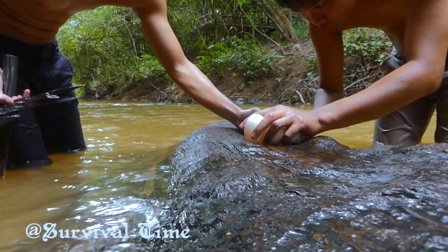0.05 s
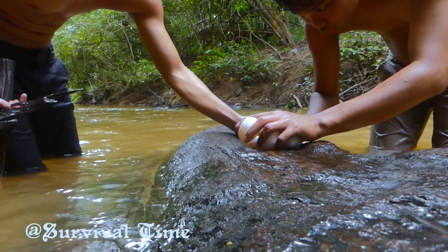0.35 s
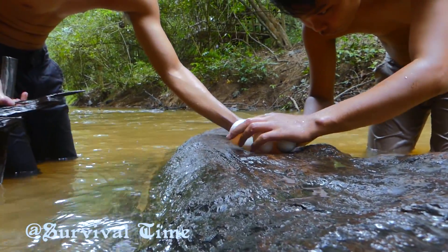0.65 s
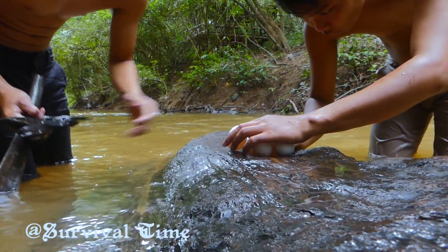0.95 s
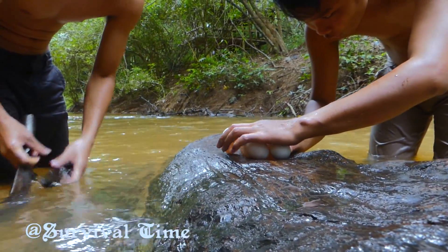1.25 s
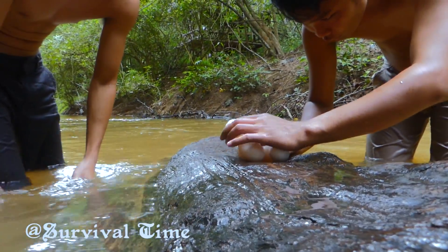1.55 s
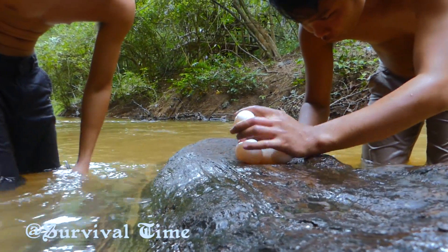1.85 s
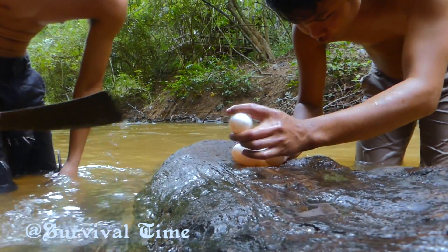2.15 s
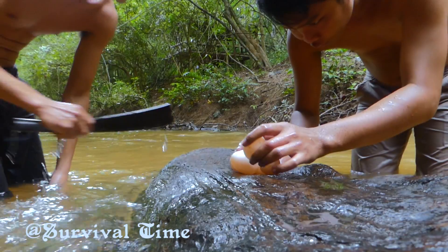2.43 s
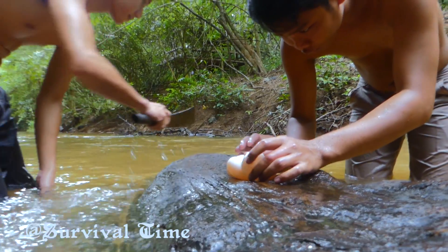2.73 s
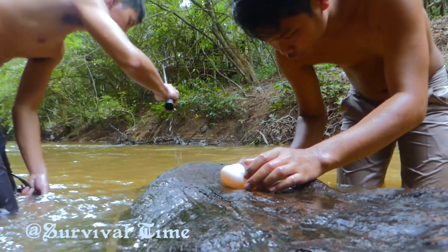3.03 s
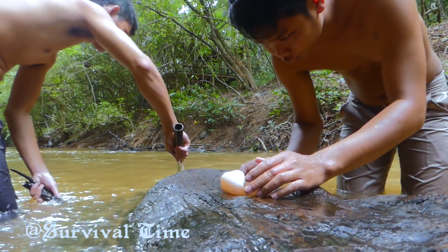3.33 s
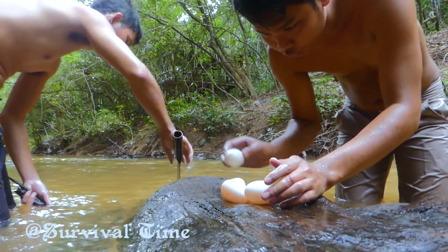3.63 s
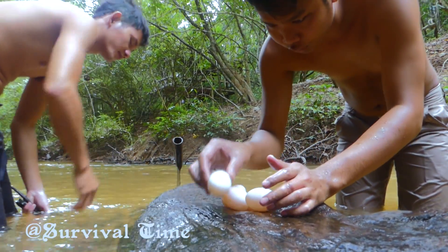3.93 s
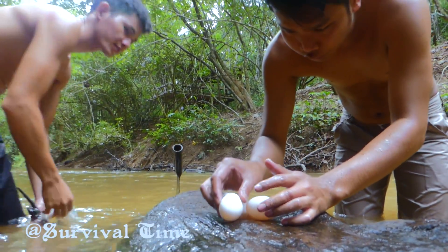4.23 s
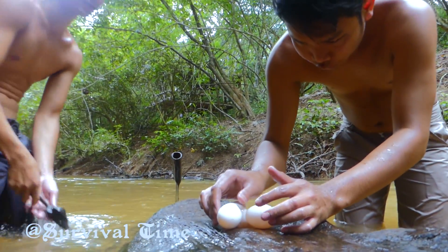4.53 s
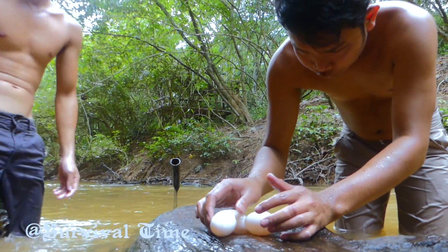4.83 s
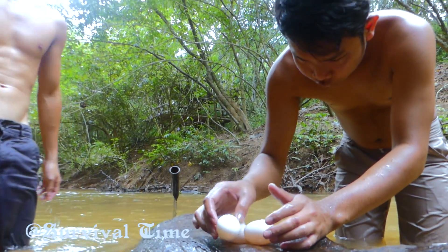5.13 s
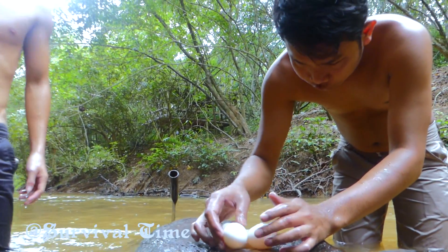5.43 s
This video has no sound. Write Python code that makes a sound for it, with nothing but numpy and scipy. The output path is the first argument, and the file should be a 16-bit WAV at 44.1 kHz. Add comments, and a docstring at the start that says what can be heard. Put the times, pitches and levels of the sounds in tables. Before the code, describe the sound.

Close splashing, bubbling and dripping in a softly running stream, with a light blade clink and a single sharp machete chop.

```python
"""A shallow stream, beside a boulder: two people stand in the water, close to a nearly mono microphone.
One rinses a machete: it clinks on stone under the surface, hands splash, trapped air rings as bubbles
and drops fall back. He drives the blade down with one hard chop, then rinses his hands.
Behind them the stream and insects murmur, with faint far calls and a slight echo off the wooded banks."""
import sys
import numpy as np
from scipy import signal
from scipy.fft import next_fast_len
from scipy.io import wavfile
from scipy.ndimage import uniform_filter1d

SR = 44100
rng = np.random.default_rng(int(sys.argv[2]) if len(sys.argv) > 2 else 0)


def wav_record(signal):
    """Record a signal, one row per channel, as 16-bit PCM in the file named by sys.argv[1]."""
    frames = np.transpose(np.atleast_2d(signal))
    bounded = np.clip(frames, -1, 1)
    # unit amplitude maps onto the largest positive 16-bit level
    quanta = np.round(bounded * 32767).astype(np.int16)
    wavfile.write(sys.argv[1], SR, quanta)


N = 245637
TIME = np.arange(N) / SR


def gain_of(db):
    """Decibels to amplitude."""
    return 10 ** (np.asarray(db) / 20)


def unit_rms(x):
    """Scales to rms 1."""
    return x / np.sqrt(np.mean(x ** 2) + 1e-20)


def at_hz(points, hz):
    """Reads a curve on a log-frequency axis."""
    f, value = np.transpose(points)
    return np.interp(np.log(hz + 1), np.log(f + 1), value)


def fader(curve):
    """A curve of t/s, level/dB as a gain for every sample."""
    return gain_of(np.interp(TIME, *np.transpose(curve)))


def add(mix, s, sound):
    """Mixes a sound in at s seconds."""
    part = mix[max(round(s * SR), 0):][:len(sound)]
    part += sound[:len(part)]


def colour(x, gain_db):
    """Minimum-phase filter whose gain in dB is a function of frequency."""
    size = next_fast_len(len(x) + 2048)
    hz = abs(np.fft.fftfreq(size, 1 / SR))
    log_gain = np.log(np.maximum(gain_of(gain_db(hz)), 1e-4))
    response = np.exp(np.conj(signal.hilbert(log_gain)))
    return np.fft.ifft(np.fft.fft(x, size) * response).real[:len(x)]


def hump(centre_hz, octaves, skirt_db=26):
    """A resonant hump with sloping skirts, in dB against frequency."""
    return lambda hz: -skirt_db * np.log10(1 + (np.log2((hz + 1) / centre_hz) / octaves) ** 2 / 2)


def wobble(count, per_s):
    """Smooth random sway of rms 1 that changes about per_s times a second."""
    t = np.arange(0, count + 16, 16) / SR
    hz = np.geomspace(per_s / 4, per_s, num=12)
    turns = hz[:, None] * t + rng.random((len(hz), 1))
    sway = np.sin(2 * np.pi * turns).sum(0) / np.sqrt(len(hz) / 2)
    return np.interp(np.arange(count) / SR, t, sway)


def bubble(hz, t60, climb, rise_cycles=0.42):
    """An air pocket rings; for the first 40 ms its pitch slides by climb octaves per second."""
    t = np.arange(int(max(t60, .004) * SR)) / SR
    pitch = np.minimum(hz * 2 ** (climb * np.minimum(t, .04)), SR / 2)
    envelope = (1 - np.exp(-t * hz / rise_cycles)) * gain_of(-60 * t / t60)
    return envelope * np.sin(2 * np.pi * np.cumsum(pitch) / SR)


def burst(hz, octaves, t60):
    """A dying crack of noise around one frequency, peaking near 1."""
    t = np.arange(4096) / SR
    fall = gain_of(-60 * t / max(t60, .002))
    crack = colour(rng.choice([-1., 1.], len(t)) * fall, hump(hz, max(octaves, .04)))
    return .5 * crack * np.linalg.norm(fall) / np.linalg.norm(crack)


def pings(spectrum, cycles, pitches, hits_each, spread_db=4.0):
    """A dense cloud of random pings at rms 1; higher ones die sooner."""
    out = np.zeros(N)
    for hz in np.geomspace(600, 14000, pitches):
        when, chance, polarity = rng.random((hits_each, 3)).T
        strength = np.sign(polarity - .5) * gain_of(spread_db * np.minimum(-np.log(chance), 3.5))
        hits = np.bincount((when * N).astype(int), strength, minlength=N)
        pitch = hz * rng.uniform(.96, 1.04)
        t60 = max(cycles / hz, .0035) * rng.uniform(0.56, 1.9)
        ring = bubble(pitch, t60, climb=rng.uniform(0, 17.0), rise_cycles=0.97)
        out += signal.oaconvolve(hits, ring / np.linalg.norm(ring) * np.sqrt(hz))[:N]
    return unit_rms(colour(out, lambda hz: at_hz(spectrum, hz)))


def churn(calm_db=-54.5):
    """How hard the hands stir the surface, as a gain; at calm_db or below it throws no spray."""
    # one curve for rinsing the blade, one for the hands: t/s, level/dB
    rinses = [
        [(1.2, -54), (1.248, -50), (1.336, -42.5), (1.384, -40.5), (1.428, -40.5), (1.55, -45), (1.628, -52.5),
         (2.12, -51), (2.228, -53), (2.95, -54)],
        [(4.05, -54.5), (4.252, -51), (4.38, -44.5), (4.442, -45), (4.562, -45), (4.748, -51), (5.052, -53),
         (5.57, -53.5)],
    ]
    stirred = sum(fader(rinse) * (TIME > rinse[0][0]) * (TIME < rinse[-1][0]) for rinse in rinses)
    return np.sqrt(np.maximum(stirred ** 2 - gain_of(calm_db) ** 2, 0))


def forest(insects_db=-62, insects_hz=4720, waver=0.017, trill_db=3.5):
    """Far off, a steady insect chorus and a few faint trilling calls."""
    # calls: t/s, length/s, start f/Hz, end f/Hz, level/dB
    far_calls = [(2.408, 0.036, 2020, 1950, -57), (2.48, 0.066, 2100, 1990, -56),
                 (2.88, 0.19, 9900, 9300, -64.5), (3.172, 0.079, 1960, 1700, -57),
                 (3.223, 0.027, 1710, 1430, -49), (4.978, 0.41, 3410, 3320, -62.5),
                 (5.25, .08, 6800, 7200, -62)]
    out = gain_of(insects_db) * unit_rms(colour(rng.standard_normal(N), hump(insects_hz, octaves=0.12)))
    for s, length, start_hz, end_hz, db in far_calls:
        count = int(length * SR)
        pitch = np.linspace(start_hz, end_hz, count) * (1 + waver * wobble(count, per_s=150))
        envelope = gain_of(db + trill_db * wobble(count, per_s=53)) * signal.windows.tukey(count, .5)
        add(out, s, envelope * np.sin(2 * np.pi * np.cumsum(pitch) / SR))
    return out


def buffeting(trim_db=1):
    """A faint low rumble comes and goes."""
    # course of the rumble: t/s, level/dB before the trim
    swells = [(0.0, -61), (0.17, -59.5), (1.18, -64), (2.5, -65), (2.78, -75), (3.21, -64), (4.98, -73),
              (5.57, -63)]
    rumble = unit_rms(colour(rng.standard_normal(N), hump(centre_hz=38.0, octaves=0.77)))
    return gain_of(trim_db) * fader(swells) * rumble


def banks(x, width=0.059, echoes_per_s=2000):
    """Scattered echoes from rock and trees reach the microphone nearly alike in both channels."""
    # decay of the wooded banks: f/Hz, t60/s
    decay = [(100, 0.35), (1000, 0.56), (5000, 0.82), (15000, 0.07)]
    taps = rng.standard_normal((2, SR // 2)) * (rng.random((2, SR // 2)) < echoes_per_s / SR)
    hz, t, spectra = signal.stft(taps, SR, nperseg=256)
    tail = signal.istft(spectra * gain_of(-60 * t / at_hz(decay, hz)[:, None]), SR, nperseg=256)[1]
    mid, side = signal.fftconvolve(x[None], tail / np.linalg.norm(tail[0]), axes=1)[:, :N]
    return np.array([mid + width * side, mid - width * side])


def ripples(swell_db=2.0, settle_s=0.22):
    """A gain that lifts the stream a little as the churning spreads and settles."""
    keep = np.exp(-1 / (settle_s * SR))
    stirred = signal.lfilter([1 - keep], [1, -keep], churn())
    return gain_of(swell_db * stirred / stirred.max())


def stream(wash_db=-50.9, patch_db=2.0):
    """The even wash of running water behind the two people, with drifting patches of brightness."""
    # spectrum of the wash: f/Hz, relative level/dB
    wash = [(15, -38), (25, -12), (144, -0.5), (205, -5.5), (241, -1.5), (425, -5.5), (812, -9.5),
            (1040, -12), (1120, -10), (1590, -13), (2810, -16), (4100, -18.5), (4690, -12), (5670, -18.5),
            (15800, -22)]
    # likeness of left and right: f/Hz, correlation
    likeness = [(60, 0.99), (180, 1), (550, 0.98), (1650, 0.98), (4970, 0.95), (15000, 0.77)]
    frames, hz = N // 256 + 5, np.fft.rfftfreq(1024, 1 / SR)
    left_re, left_im, other_re, other_im, patches = rng.standard_normal((frames, len(hz), 5)).T
    patches = unit_rms(uniform_filter1d(uniform_filter1d(patches, size=9, axis=0), size=8, axis=1))
    alike = at_hz(likeness, hz)[:, None]
    left = left_re + 1j * left_im
    right = alike * left + np.sqrt(1 - alike ** 2) * (other_re + 1j * other_im)
    spectra = np.array([left, right]) * gain_of(at_hz(wash, hz)[:, None] + patch_db * patches)
    water = signal.istft(spectra, nperseg=1024, noverlap=768)[1][:, :N]
    return gain_of(wash_db) * ripples() * unit_rms(water)


def spray(fizz_db=-3, mist_db=-6.5):
    """Close by, countless tiny bubbles and bursting droplets follow the churning."""
    # tiny bubbles: f/Hz, relative level/dB
    fizz_spectrum = [(500, -7.5), (1300, 2), (2500, 0), (4000, -3), (6000, -7.5), (9000, -6), (13000, -28)]
    # bursting droplets: f/Hz, relative level/dB
    mist_spectrum = [(200, -18), (600, 2), (1500, 0), (3000, -3), (6000, 0), (10000, -6), (15000, -12)]
    fizz = pings(fizz_spectrum, cycles=46, pitches=44, hits_each=170)
    mist = pings(mist_spectrum, cycles=13, pitches=16, hits_each=1100)
    return churn() * (gain_of(fizz_db) * fizz + gain_of(mist_db) * mist)


def spatter(over_churn_db=10.5, low_hz=2600, high_hz=9500, spread_db=12, count=230):
    """Droplets thrown up by the churning crackle as they land."""
    out = np.zeros(N)
    for k, (late, pitch, size) in enumerate(rng.random((count, 3))):
        tick = burst(low_hz * (high_hz / low_hz) ** pitch, octaves=0.25, t60=0.012)
        add(out, (k + late) / count * N / SR, gain_of(spread_db * (size - .5)) * tick)
    return gain_of(over_churn_db) * churn() * out


def froth(over_churn_db=6, low_hz=1200, high_hz=4200, cycles=45, max_climb=20, spread_db=9, count=420):
    """Small bubbles chirp upward at random, louder the harder the surface is churned."""
    out = np.zeros(N)
    for when, pitch, size, climb in rng.random((count, 4)):
        hz = low_hz * (high_hz / low_hz) ** pitch
        chirp = bubble(hz, cycles / hz, max_climb * climb, rise_cycles=1.1)
        add(out, when * N / SR, gain_of(spread_db * (size - .5)) * chirp)
    return gain_of(over_churn_db) * churn() * out


def drips(click_db=-15, trickle_hz=6800, scatter_octaves=0.5, spread_db=2.5):
    """Big drops tick and click on water and rock; small ones trickle off the lifted blade and hands."""
    # single drops: t/s, level/dB, centre f/Hz
    drops = [(1.3027, -19.5, 6440), (1.3433, -26, 5800), (1.369, -22.5, 10500), (1.428, -18.5, 5860),
             (1.472, -24.5, 4800), (1.511, -19, 7600), (1.58, -28, 5500), (1.571, -19, 5400),
             (1.9478, -26, 5960), (1.96, -30, 7000), (1.9783, -27, 10200), (2.005, -20.5, 9700),
             (2.208, -29, 5870), (2.232, -30, 8600), (2.266, -31, 4970), (2.3821, -23, 4970),
             (2.568, -29.5, 7100), (2.717, -34, 6400), (2.754, -28, 4340), (4.201, -28.5, 4970),
             (4.237, -31, 2800), (4.2915, -8.5, 5700), (4.3264, -22.5, 8160), (4.4326, -25.5, 4230),
             (4.501, -24, 8050), (4.518, -25.5, 3550), (4.5605, -26, 5500), (4.649, -28.5, 5860),
             (4.6962, -14, 7670), (4.986, -28.5, 7300), (5.025, -25, 6650), (5.122, -31.5, 5000)]
    # runs of small drops: start t/s, end t/s, rate/Hz, level/dB
    trickles = [(1.8, 2.35, 20, -37), (2.55, 2.8, 12, -37), (4.401, 4.902, 14, -35)]
    out = np.zeros(N)
    for s, db, hz in drops:
        tick = burst(hz, octaves=0.2, t60=0.016)
        click = gain_of(click_db) * burst(hz=9000, octaves=1.0, t60=0.007)
        add(out, s, gain_of(db) * (tick + click))
    for start, end, per_s, db in trickles:
        for s in np.arange(start, end, 1 / per_s):
            late = rng.random() / per_s
            size, pitch = rng.standard_normal(2)
            tick = burst(trickle_hz * 2 ** (scatter_octaves * pitch), octaves=0.2, t60=0.024)
            add(out, s + late, gain_of(db + spread_db * size) * tick)
    return out


def plinks(cycles=62, sag_octaves_per_cycle=0.005, tick_db=-8, tick_ratio=1.85):
    """A drop ticks on the surface and drives a bubble down, so its pitch sags."""
    # falling drops that trap a bubble: t/s, f/Hz, level/dB
    drops = [(1.624, 1040, -32.5), (1.851, 3420, -26.5), (1.91, 1850, -29.5), (1.991, 2140, -28),
             (1.999, 1418, -24), (2.02, 2660, -29.5), (4.058, 963, -25.5), (4.196, 1270, -30.5),
             (4.607, 1650, -18), (4.729, 1013, -27.5), (4.757, 1290, -22.5), (4.808, 1090, -30.5)]
    out = np.zeros(N)
    for s, hz, db in drops:
        add(out, s, gain_of(db + tick_db) * burst(tick_ratio * hz, octaves=0.63, t60=0.015))
        add(out, s, gain_of(db) * bubble(hz, cycles / hz, climb=-sag_octaves_per_cycle * hz))
    return out


def bubbles(flutter=0.17, ring_cycles=70.3, pop_cycles=23, gulp_cycles=8.0):
    """Trapped air rings and flutters on the moving surface; pops and gulps die in fewer cycles."""
    # air pushed under by the hands: t/s, f/Hz, level/dB, climb/(octaves per s)
    trapped_air = [(1.297, 2073, -30, 3), (1.329, 2190, -29, 3), (1.368, 1600, -27, -9.5),
                   (1.384, 363, -21.5, 2.5), (1.389, 750, -17.5, -2), (1.402, 602, -12.5, 2.5),
                   (1.461, 1680, -28.5, 13), (1.498, 1700, -22.5, 1), (1.511, 1435, -15.5, 2.5),
                   (1.518, 1199, -22.5, -1), (1.535, 799, -23, 7.5), (4.18, 1425, -39, 21),
                   (4.253, 1450, -27, 17), (4.284, 1050, -27, 12), (4.305, 1986, -27, 1),
                   (4.312, 1190, -23, 35), (4.312, 2500, -27, 15), (4.318, 1595, -28, 14),
                   (4.367, 2030, -31, -5), (4.923, 838, -41.5, 26), (5.038, 870, -39, 2),
                   (5.058, 394, -42, 11), (5.086, 550, -37, 35.5)]
    # open pockets popping at the surface: t/s, f/Hz, level/dB
    pops = [(.112, 1980, -29), (1.314, 470, -20), (1.369, 1950, -21), (1.572, 1570, -29.5),
            (4.248, 1300, -26), (4.292, 780, -14), (4.301, 930, -20), (4.357, 894, -19), (4.358, 1340, -27),
            (4.519, 1300, -28.5)]
    # dull gulps against the legs and the boulder: t/s, f/Hz, level/dB
    gulps = [(.257, 63, -38.5), (.99, 154, -26.5), (1.051, 150, -32.5), (1.611, 150, -37),
             (1.651, 145, -33.5), (2.25, 42, -40), (2.327, 165, -34.5), (4.653, 158, -25.5),
             (5.524, 141, -33)]
    out = np.zeros(N)
    for s, hz, db, climb in trapped_air:
        ring = bubble(hz, ring_cycles / hz, climb, rise_cycles=0.6)
        add(out, s, gain_of(db) * ring * (1 + flutter * wobble(len(ring), per_s=208)))
    for s, hz, db in pops:
        add(out, s, gain_of(db) * bubble(hz, pop_cycles / hz, climb=20))
    for s, hz, db in gulps:
        add(out, s, gain_of(db) * bubble(hz, gulp_cycles / hz, climb=-11, rise_cycles=0.43))
    return out


def slaps(octaves=0.72, first_db=-1.5, closing_db=-7, closing_s=0.003):
    """Broad wet cracks; the water closes a moment later with a second, weaker one."""
    # hands and blade on the water, wet things on the rock: t/s, relative level/dB, centre f/Hz, t60/s
    hits = [(.408, -33, 1200, 0.03), (.513, -41, 9000, .037), (.781, -37, 3500, 0.056),
            (1.268, -12.5, 4750, 0.021), (1.2696, -20, 1210, 0.016), (1.313, -14, 755, 0.027),
            (1.357, -28, 900, .04), (1.361, -21, 5000, 0.032), (1.3807, -21, 480, .022),
            (1.3822, -15, 2850, .015), (1.3894, -13, 1290, 0.023), (1.398, -12.5, 2520, 0.021),
            (1.422, -23.5, 7000, 0.051), (1.508, -25, 3500, .06), (2.086, -31, 8500, .03),
            (2.8259, -26, 580, .016), (4, -34, 13000, .012), (4.293, -18.5, 1810, 0.039),
            (5.345, -33, 890, .02), (5.4412, -31.5, 540, 0.053)]
    out = np.zeros(N)
    for s, db, hz, t60 in hits:
        add(out, s, gain_of(db + first_db) * burst(hz, octaves, t60))
        add(out, s + closing_s, gain_of(db + closing_db) * burst(hz, octaves, t60))
    return out


def clink(at_s=1.1525, rise_s=0.00064, sink_s=0.035, chatter_db=3.5, knock_db=-26, scrape_db=-22):
    """Steel touches stone, rings and chatters; water loads the sinking blade and pulls its modes down."""
    # modes of the dipped blade: f/Hz, level/dB, t60/s, sag as a share of the pitch
    modes = [(1038, -17.5, 0.09, 0.08), (1288, -21.5, 0.1, .03), (1715, -32.5, 0.24, 0.019),
             (2860, -24, 0.097, 0.067), (2620, -49, 0.45, 0.0042), (3690, -23, 0.025, .02),
             (4800, -30.5, 0.085, 0.049), (4680, -42, 0.38, 0.0027), (6210, -39, 0.12, .01),
             (7200, -31.5, 0.096, .005), (8900, -52, 0.11, .005)]
    out, t = np.zeros(N), np.arange(SR // 2) / SR
    for hz, db, t60, sag in modes:
        turns = np.cumsum(hz * (1 - sag * (1 - np.exp(-t / sink_s)))) / SR
        ring_db = db - 60 * t / t60 + chatter_db * wobble(len(t), per_s=132)
        add(out, at_s, gain_of(ring_db) * (1 - np.exp(-t / rise_s)) * np.sin(2 * np.pi * turns))
    add(out, at_s, gain_of(knock_db) * burst(hz=620, octaves=0.6, t60=0.025))
    add(out, at_s + 0.000965, gain_of(scrape_db) * burst(hz=2550, octaves=0.77, t60=0.091))
    return out


def chop(at_s=3.3165, thud_db=-2.5, thud_hz=205, thud_s=0.012, crack_db=-10, grit_db=-32,
         bite_s=0.001, build_cycles=0.78, quiver_db=5.5, flex_radians=0.9, settle_s=0.029):
    """Close up, the point bites with a thud and a crack; the damped blade quivers and sings faintly."""
    # modes of the blade driven home: f/Hz, level/dB, t60/s
    modes = [(146.6, -23, 0.14), (248, -27.5, .09), (371, -32.5, 0.14), (540, -2.5, 0.025),
             (720, -10, 0.026), (997, -18, 0.033), (1329, -8.5, 0.04), (1320, -46, 0.56), (1330, -56, .45),
             (1980, -19, 0.019), (2356, -10.5, 0.022), (2470, -55, 0.48), (2720, -9.5, 0.021),
             (3000, -11, 0.021), (3170, -18.5, 0.019), (4400, -21, 0.033), (5240, -25.5, 0.032),
             (6153, -16.5, .031), (6190, -52.5, 0.64), (6440, -59, .45), (8080, -23, 0.019),
             (8280, -56, 0.38), (9570, -25, 0.03)]
    out, t = np.zeros(N), np.arange(SR * 2 // 3) / SR
    sway = 1 - np.exp(-t / settle_s)
    for k, (hz, db, t60) in enumerate(modes):
        ring_db = db - 60 * t / t60 + quiver_db * sway * wobble(len(t), per_s=46)
        flex = flex_radians * sway * wobble(len(t), per_s=70)  # the swaying blade bends its pitch
        build = 1 - np.exp(-t / max(bite_s, build_cycles / hz))  # low modes take longer to build
        add(out, at_s, (-1) ** k * gain_of(ring_db) * build * np.sin(2 * np.pi * hz * t + flex))
    push = signal.windows.hann(int(thud_s * SR))  # the ground gives and springs back
    thud = -.5 * push * np.cos(2 * np.pi * thud_hz * (t[:len(push)] - thud_s / 2))
    add(out, at_s + 0.0028 - thud_s / 2, gain_of(thud_db) * thud)
    add(out, at_s + .0004, gain_of(crack_db) * burst(hz=2400, octaves=1.26, t60=0.013))
    grit = burst(hz=2780, octaves=0.83, t60=.11)  # grit shifts round the point
    add(out, at_s + .004, gain_of(grit_db) * grit)
    return out


def scene(water_echo_db=-21, blade_echo_db=-32):
    """Water and blade close to the microphone and dead centre, with the stream and the forest behind."""
    water = slaps() + bubbles() + plinks() + drips() + froth() + spatter() + spray()
    blade = clink() + chop()
    echo = banks(gain_of(water_echo_db) * water + gain_of(blade_echo_db) * blade)
    return water + blade + echo + stream() + forest() + buffeting()


def record(dry, edge_hz=15900):
    """The microphone signal clips at full scale, then loses the treble above edge_hz."""
    lowpass = signal.firwin(255, edge_hz, window=("kaiser", 8), fs=SR)
    return signal.oaconvolve(np.clip(dry, -1, 1), lowpass[None], "same")


dry = scene()
out = record(dry)
wav_record(out)
```